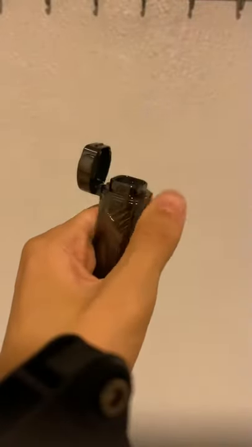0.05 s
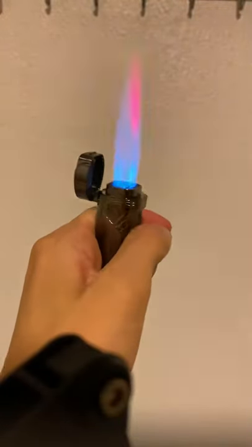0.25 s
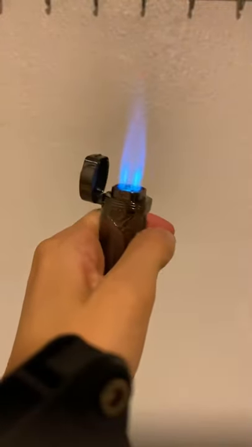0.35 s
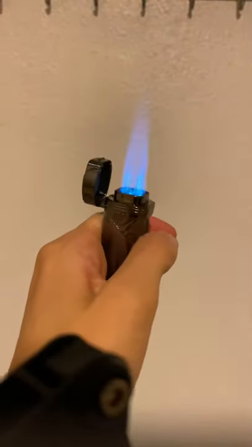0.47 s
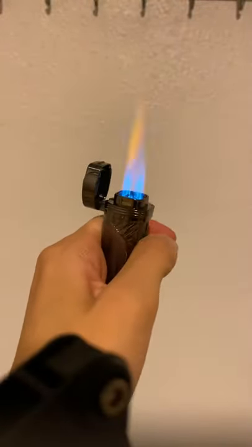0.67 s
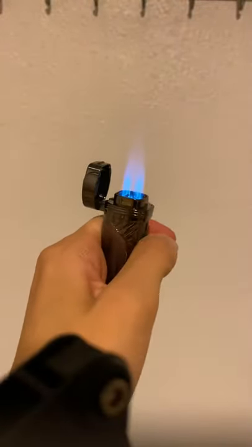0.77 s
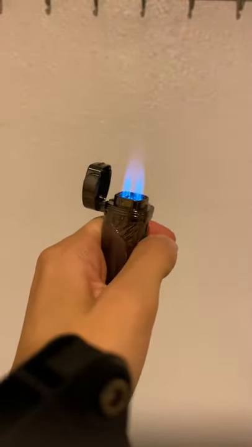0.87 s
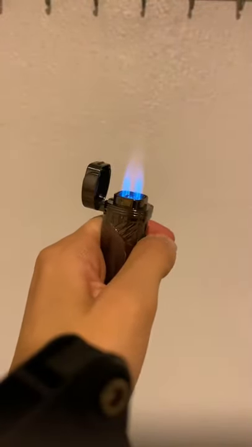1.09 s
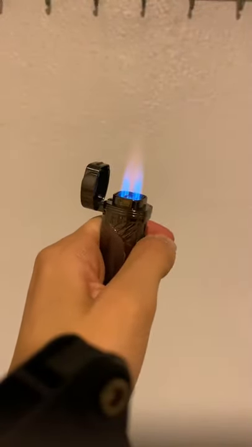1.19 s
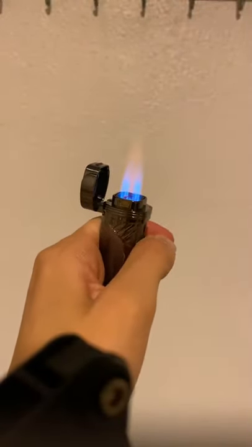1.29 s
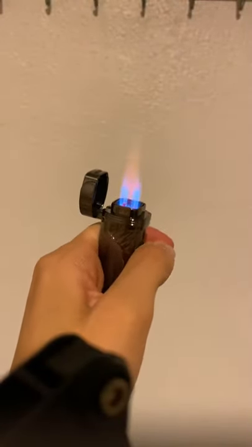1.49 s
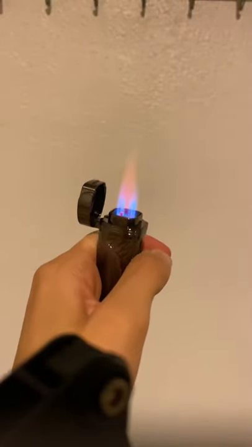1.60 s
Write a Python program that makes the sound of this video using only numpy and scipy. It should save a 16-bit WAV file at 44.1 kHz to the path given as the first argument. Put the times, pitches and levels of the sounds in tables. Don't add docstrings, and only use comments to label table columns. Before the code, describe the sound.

A jet lighter, close, in a small hard room. A faint metallic lid ring fades over low room rumble; tiny trigger ticks at 0.12-0.15 s, gas hiss from 0.17. At 0.22 a loud, bright clustered snap rings briefly off the walls, with a soft ignition thump. A much quieter, loose low roar flutters, swells near 0.45, dips, sputters at 0.86, then tightens into a brighter, steady jet until the end, around 1.5.

```python
import sys
import numpy as np
from scipy import signal
from scipy.fft import rfft, irfft, next_fast_len
from scipy.io import wavfile

SR = 44100
rng = np.random.default_rng(int(sys.argv[2]) if len(sys.argv) > 2 else 0)


def to_linear_factor(level_db):
    exponent = np.asarray(level_db, float) / 20
    return 10 ** exponent


def dump(signal):
    limited = np.clip(np.atleast_2d(signal).T, -1, 1)
    pcm = np.round(limited * 32767).astype(np.int16)
    wavfile.write(sys.argv[1], SR, pcm)


N = 72765
T = np.arange(N) / SR

# pitch in Hz, width in Hz, level in dB.
LID_RINGS = [(2560, 500, -10), (3200, 200, -6.5), (4300, 1000, -5), (5200, 120, -4), (5600, 250, 3.5),
             (6900, 2200, -1.5), (9700, 1800, -13.5)]
LID_DB, LID_T60_S = -56, .17

# frequency in Hz, density in dB per Hz.
AIR_SPECTRUM = [(22, -17), (40, 0), (125, -3.5), (170, -15), (400, -11), (900, -27), (2500, -33),
                (7000, -41)]
AIR_DB, DRAUGHT_DB, LIT_S = -60.5, 4, 0.18

# time in seconds, peak in dB, tilt in dB per octave.
CONTACTS = [(0.1177, -54.5, -8), (0.1482, -47.5, -0.5), (.208, -41.5, -4), (0.2167, -28.5, 2.5),
            (.2161, -17, 11), (0.2164, -11, 1), (.2180, -22, 2.5), (0.2194, -16.5, -0.2),
            (.2232, -25.5, -4), (0.2262, -23.5, -1.5), (0.2337, -26.5, 8), (.859, -49.5, -4)]
# pitch in Hz, level in dB, 60 dB decay in seconds.
BODY_MODES = [(1805, -5, 0.026), (2460, -16.5, 0.024), (2660, -13, .014), (3050, -2.5, 0.011),
              (3540, -2.5, 0.0081), (3880, 2, 0.0082), (4300, -1.5, .009), (5280, .5, 0.0067),
              (6360, -3.5, 0.0069), (8060, -3, .005), (9950, -2, 0.0065), (10660, 0, 0.0054),
              (13000, -20, .005), (15340, -14, .008)]
SNAP_DB, SPREAD_DB, SMALL_BODY_HZ, STRAIGHT_SHARE = -7, 2.5, 1640, .3

# frequency in Hz, density in dB per Hz.
HISS_SPECTRUM = [(2000, -11.5), (4200, -9.5), (5200, -0.5), (6200, -17), (9000, -1), (11500, -4),
                 (13500, -5.5), (15800, -2)]
HISS_DB, VALVE_S, VALVE_RISE_S, RUSH_DB, RUSH_S = -66.5, .172, 0.017, 7, .15

# frequency in Hz, density in dB per Hz.
TAIL_SPECTRUM = [(800, -34), (1500, -6.5), (2600, 0), (4000, -3.5), (5500, -4), (7000, -1.2), (10500, -6.5),
                 (15500, -28)]
# frequency in Hz, 60 dB decay in seconds.
TAIL_T60 = [(1000, .15), (3000, 0.21), (6000, 0.21), (11000, 0.13), (15500, .07)]
TAIL_DB, TAIL_START_S, TAIL_RISE_S = -28.7, .2165, .003
TAIL_RING_HZ, TAIL_RING_DB = 70, -1.5

FRONT_S, FRONT_DB, FRONT_HZ, FRONT_FALL_S, FRONT_LENGTH_S = .2165, -41, 1508, 0.00605, .016

# start in seconds, level in dB, pitch in Hz, length in seconds.
PUFFS = [
    (.227, -30, 88, 0.023),
    (.222, -45.5, 380, .012),
    (.275, -40.5, 468, .012),
    (.278, -45, 60, 0.031),
    (.856, -36.5, 410, .008),
    (0.861, -38.5, 95, 0.015),
    (1.352, -43, 89, .016),
]

# time in seconds, loose roar in dB, tight jet in dB.
FLAME_COURSE = [(.2, -80, -88), (.24, -60.5, -71), (.3, -57, -67), (.35, -53.5, -67), (.42, -53.5, -65.5),
                (.46, -50.5, -62), (.495, -54, -59.5), (.515, -61.5, -67.5), (.6, -60.5, -64),
                (.7, -60, -61.5), (.8, -56.5, -59), (.84, -56.5, -57.5), (.9, -55, -56.5), (1.05, -57, -55),
                (1.3, -58, -52.5), (1.65, -57.5, -51)]
# frequency in Hz, density in dB per Hz.
ROAR_SPECTRUM = [(150, -19), (240, -17.5), (320, -6), (430, 0), (580, -3), (950, -9.5), (1500, -20),
                 (3000, -34.5)]
# frequency in Hz, density in dB per Hz.
JET_SPECTRUM = [(300, -12.5), (600, -3), (900, 0), (1350, 0.5), (2300, -4), (3100, -11.5), (4800, -16),
                (6500, -35)]
# pitch in Hz, width in Hz, level in dB.
CUP_RESONANCES = [(302, 67, -2), (423, 40, -5), (563, 74, -7.5), (709, 50, -7.5), (861, 87, -0.6),
                  (1021, 41, -6), (1353, 114, -1.5), (1770, 88, -5.5), (2296, 270, -3.5)]

# frequency in Hz, level in dB.
DIFFUSE_SHARE = [(60, -35.5), (200, -16), (700, -8.5), (1700, -27.5), (3000, -7.5), (6000, -17),
                 (15000, -14)]
# frequency in Hz, lead of the left port in radians.
PORT_LEAD = [(150, -0.08), (800, -0.48), (4200, 1.6669), (5300, 0.39), (6900, 3.14), (10700, 6),
             (13750, 9.5), (15600, 12.2)]
STEP_SHARE = 0.5


def at_hz(points, hz):
    table_hz, values = np.transpose(points)
    return np.interp(np.log(hz), np.log(table_hz), values)


def rms_one(x):
    return x / np.sqrt(np.mean(x ** 2) + 1e-20)


def resonate(x, hz, width):
    r = np.exp(-np.pi * width / SR)
    feedback = [1, -2 * r * np.cos(2 * np.pi * hz / SR), r * r]
    return signal.lfilter([(1 - r * r) / 2, 0, (r * r - 1) / 2], feedback, x)


def drift(rate):
    r = np.exp(-80 * np.pi * rate / SR)
    steps = rng.standard_normal(N // 40 + 2002)
    slow = signal.lfilter([1], [1, -2 * r, r * r], steps)[2000:]
    return np.interp(np.arange(N) / 40, np.arange(len(slow)), rms_one(slow))


def ports(x):
    size = next_fast_len(N + 4096)
    hz = np.arange(size // 2 + 1) * SR / size
    lead = np.interp(hz, *np.transpose(PORT_LEAD))
    half = (lead - STEP_SHARE * np.sin(2 * lead)) / 2
    turned = rfft(x, size) * np.exp(1j * np.outer([1, -1], half))
    return irfft(turned, size)[:, :N]


def turbulence(spectrum, patchy_db, rate, diffuse_db, t60=None):
    out, power = 0, 0
    together = drift(rate)
    white = rng.standard_normal((2, 2, N + 3000))
    edges = spectrum[0][0] * .8 * 2 ** np.arange(0, 10, .4)
    edges = edges[edges < min(1.5 * spectrum[-1][0], .45 * SR)]
    for k, (low, high) in enumerate(zip(edges, edges[1:])):
        band_filter = signal.butter(2, [low, high], "band", fs=SR, output="sos")
        band = signal.sosfilt(band_filter, white[k % 2])[:, 3000:]
        hz = np.sqrt(low * high)
        power += to_linear_factor(2 * at_hz(spectrum, hz)) * 2 * (high - low) / SR
        db = at_hz(spectrum, hz) + patchy_db * (0.76 * together + drift(2 * rate))
        if t60:
            db = db - 60 * np.maximum(T - TAIL_START_S, 0) / at_hz(t60, hz)
        around = to_linear_factor(at_hz(DIFFUSE_SHARE, hz) + diffuse_db)
        out = out + band * np.maximum(to_linear_factor(db), 1e-9) * [[1], [around]]
    direct, diffuse = out
    return (ports(direct) + diffuse * [[1], [-1]]) / np.sqrt(power)


def lid():
    white = rng.standard_normal(N + 2000)
    ring = sum(to_linear_factor(db) * rms_one(resonate(white, hz, width))[2000:] for hz, width, db in LID_RINGS)
    return ports(rms_one(ring) * to_linear_factor(LID_DB - 60 * T / LID_T60_S))


def air():
    draught = DRAUGHT_DB * np.clip((T - LIT_S) / .06, 0, 1)
    rumble = turbulence(AIR_SPECTRUM, patchy_db=1.83, rate=8.1, diffuse_db=3.5)
    return to_linear_factor(AIR_DB + draught) * rumble


def striker():
    s, db, tilt_db = np.transpose(CONTACTS)
    at = (s * SR).astype(int)
    draws = rng.standard_normal((len(s), len(BODY_MODES)))
    out = np.zeros(N)
    for k, (hz, mode_db, t60) in enumerate(BODY_MODES):
        strike_db = db + mode_db + SNAP_DB + SPREAD_DB * draws[:, k] + tilt_db * np.log2(hz / 4000)
        clicks = np.full(N, 1e-18)
        clicks[at] = to_linear_factor(strike_db)
        r, w = to_linear_factor(-60 / (t60 * SR)), 2 * np.pi * hz / SR
        out += signal.lfilter([0, np.sin(w)], [1, -2 * r * np.cos(w), r * r], clicks)
    out = signal.sosfilt(signal.butter(4, SMALL_BODY_HZ, "high", fs=SR, output="sos"), out)
    straight = out * to_linear_factor(np.array([[-1.5], [1.5]]))
    return (1 - STRAIGHT_SHARE) * ports(out) + STRAIGHT_SHARE * straight


def gas():
    since = np.maximum(T - VALVE_S, 0)
    level = to_linear_factor(HISS_DB + RUSH_DB * np.exp(-since / RUSH_S))
    opening = np.clip(since / VALVE_RISE_S, 0, 1)
    return level * opening * turbulence(HISS_SPECTRUM, patchy_db=0.43, rate=8.7, diffuse_db=4.5)


def room_tail():
    rise = np.clip((T - TAIL_START_S) / TAIL_RISE_S, 0, 1)
    noise = turbulence(TAIL_SPECTRUM, patchy_db=0.8, rate=40, diffuse_db=7, t60=TAIL_T60)
    tail = to_linear_factor(TAIL_DB) * rise * noise
    pitched = sum(resonate(tail, hz, TAIL_RING_HZ) for hz, db, t60 in BODY_MODES)
    return 0.85 * tail + to_linear_factor(TAIL_RING_DB) * pitched


def front():
    since = np.clip(T - FRONT_S, 0, FRONT_LENGTH_S)
    turns = FRONT_HZ * FRONT_FALL_S * (1 - np.exp(-since / FRONT_FALL_S))
    swell = np.sin(np.pi * since / FRONT_LENGTH_S)
    return to_linear_factor(FRONT_DB) * swell * np.sin(2 * np.pi * turns)


def puffs():
    out = np.zeros(N)
    for s, db, hz, length in PUFFS:
        progress = np.clip((T - s) / length, 0, 1)
        swing = np.cos(2 * np.pi * hz * (T - s - .45 * length))
        out -= to_linear_factor(db) * np.sin(np.pi * progress) ** 2 * swing
    return out


def flame():
    s, roar_db, jet_db = np.transpose(FLAME_COURSE)
    roar = turbulence(ROAR_SPECTRUM, patchy_db=1.63, rate=14, diffuse_db=-1.8)
    jet = turbulence(JET_SPECTRUM, patchy_db=1.1, rate=16, diffuse_db=-1.0)
    burn = to_linear_factor(np.interp(T, s, roar_db)) * roar + to_linear_factor(np.interp(T, s, jet_db)) * jet
    cup = sum(to_linear_factor(db) * resonate(burn, hz, width) for hz, width, db in CUP_RESONANCES)
    return 0.74 * burn + cup


def scene():
    return lid() + air() + striker() + gas() + room_tail() + front() + puffs() + flame()


def top_cut(x):
    return signal.sosfilt(signal.butter(12, 16990, fs=SR, output="sos"), x)


def record(dry):
    low_pass = signal.ellip(10, .5, 60, 15800, fs=SR, output="sos")
    mix = signal.sosfilt(low_pass, dry)
    return top_cut(mix)


dry = scene()
out = record(dry)
dump(out)
```